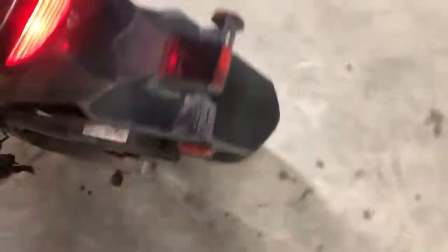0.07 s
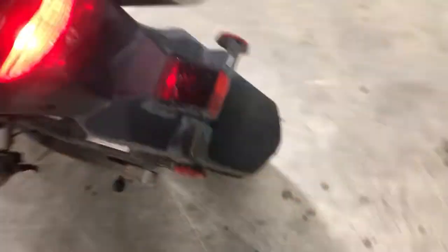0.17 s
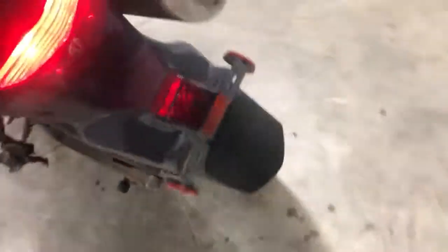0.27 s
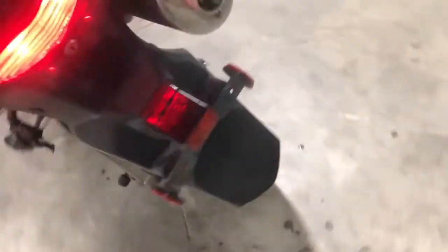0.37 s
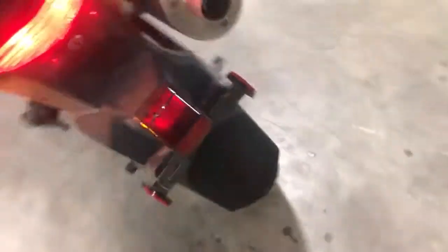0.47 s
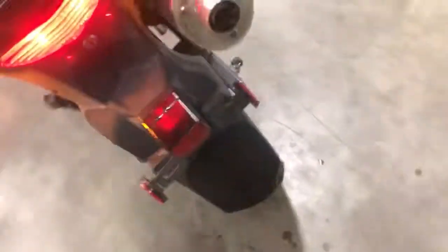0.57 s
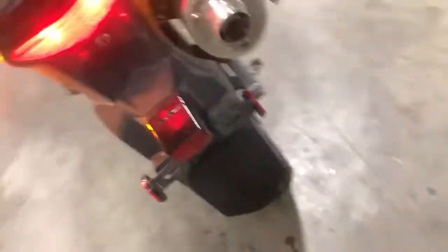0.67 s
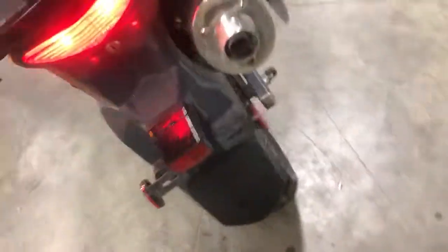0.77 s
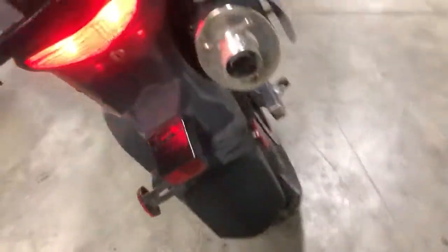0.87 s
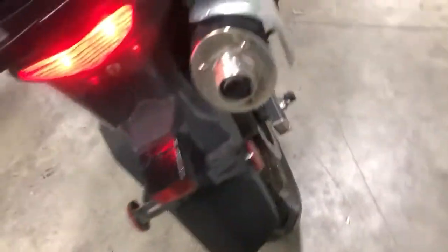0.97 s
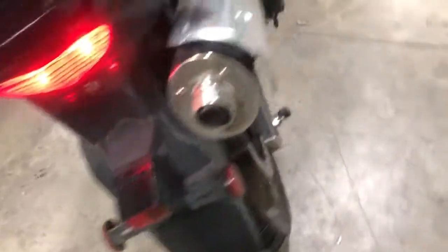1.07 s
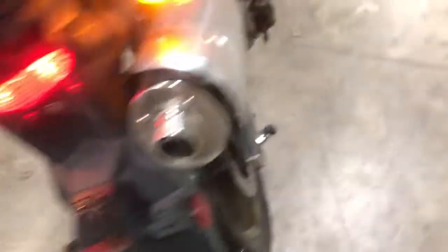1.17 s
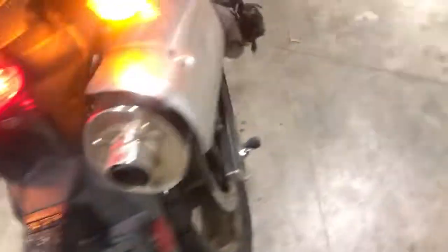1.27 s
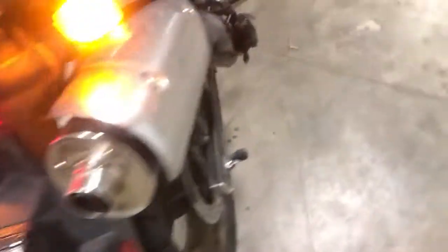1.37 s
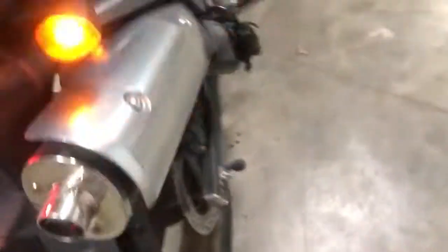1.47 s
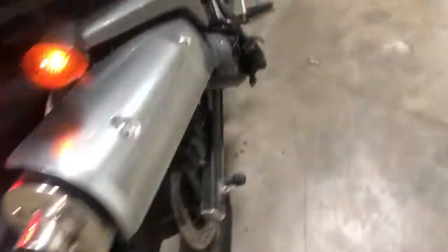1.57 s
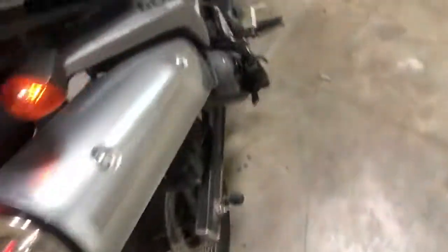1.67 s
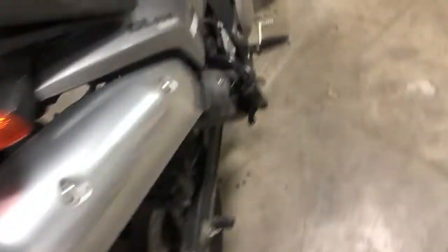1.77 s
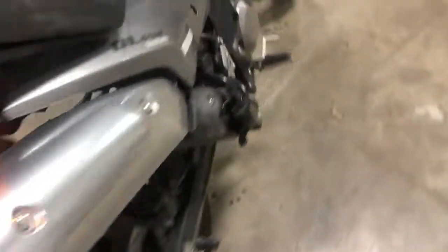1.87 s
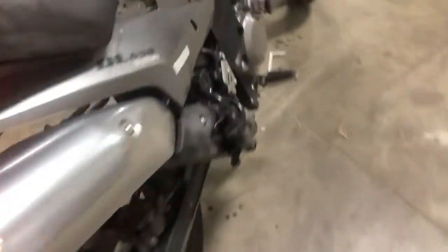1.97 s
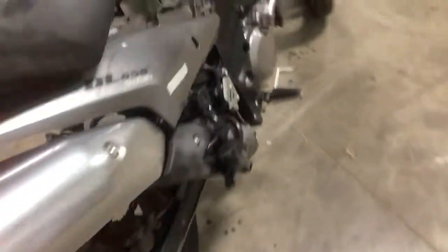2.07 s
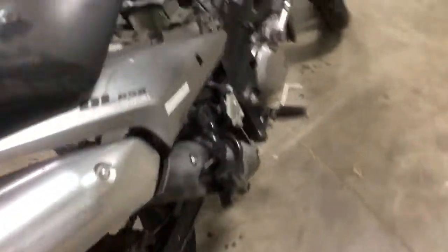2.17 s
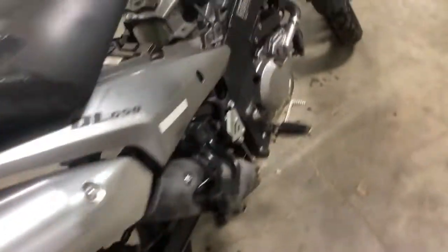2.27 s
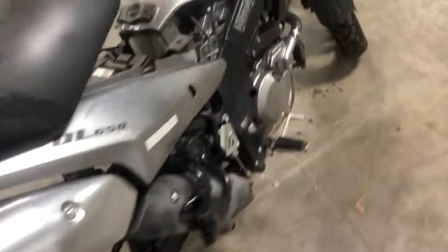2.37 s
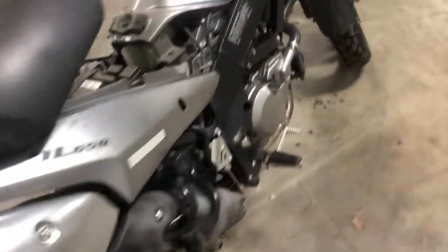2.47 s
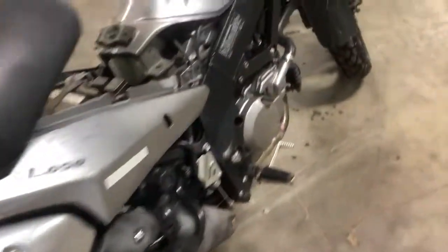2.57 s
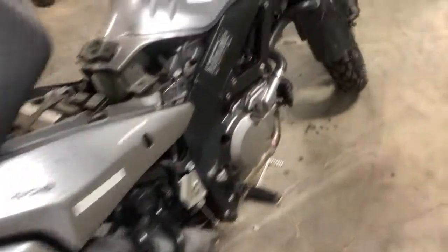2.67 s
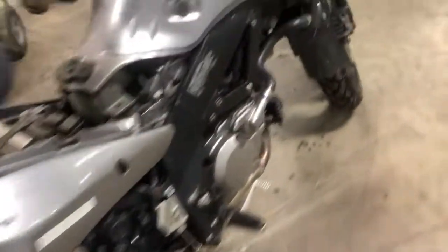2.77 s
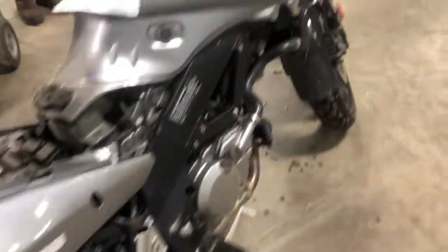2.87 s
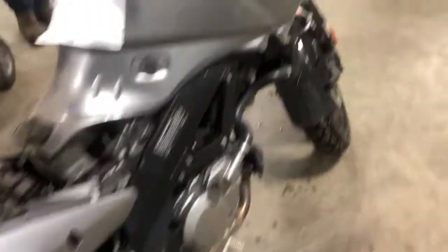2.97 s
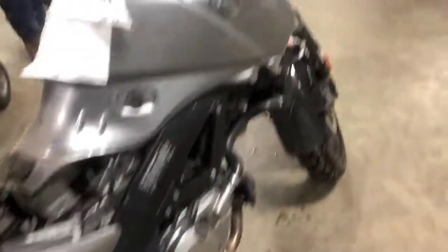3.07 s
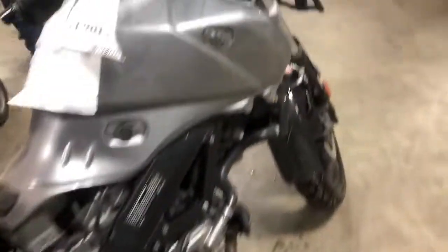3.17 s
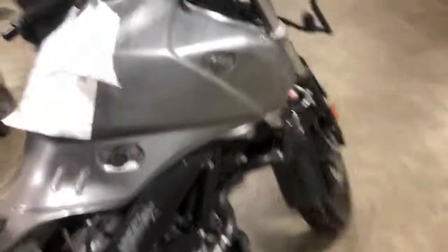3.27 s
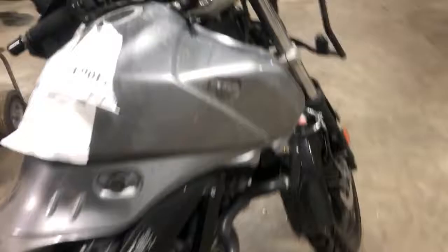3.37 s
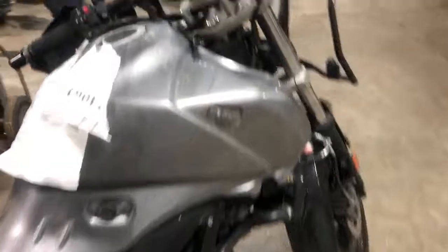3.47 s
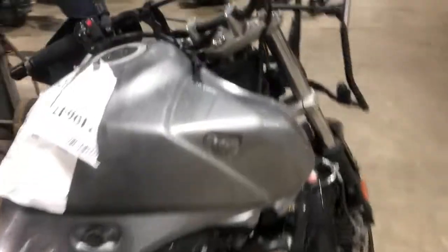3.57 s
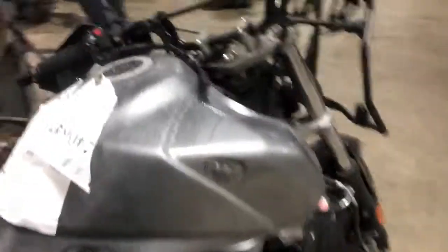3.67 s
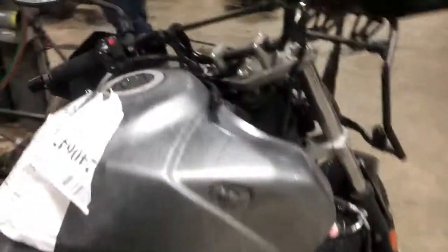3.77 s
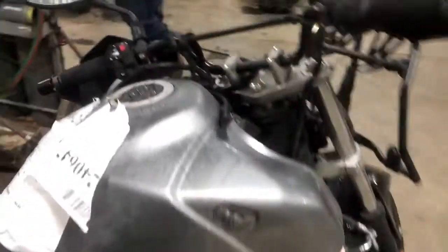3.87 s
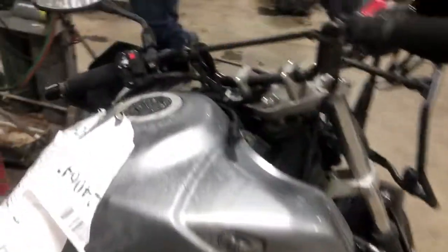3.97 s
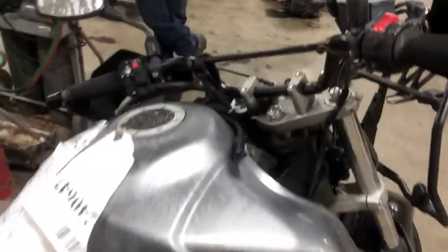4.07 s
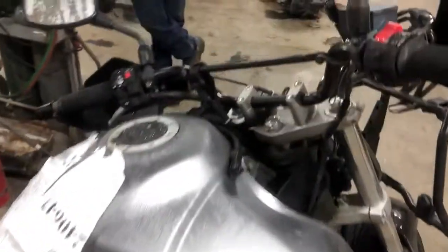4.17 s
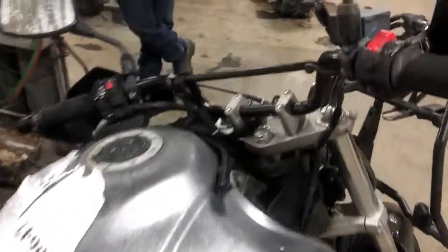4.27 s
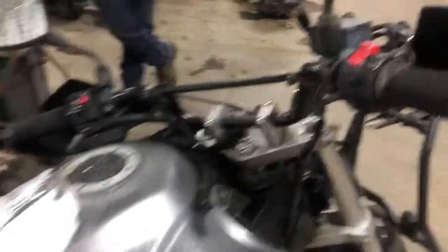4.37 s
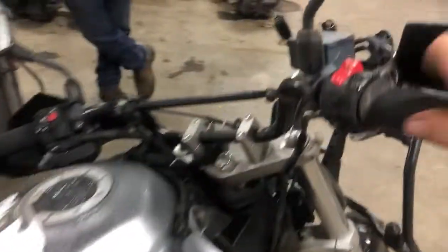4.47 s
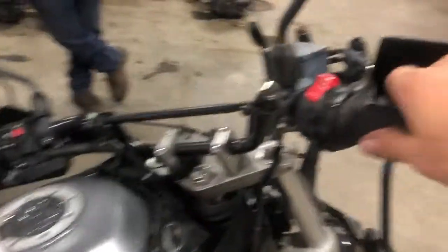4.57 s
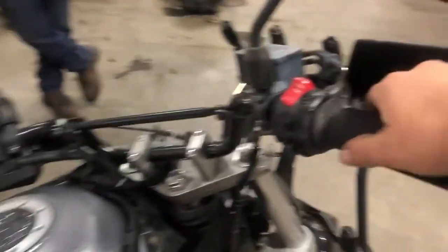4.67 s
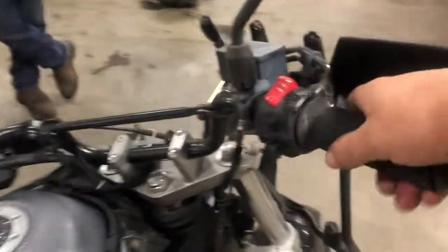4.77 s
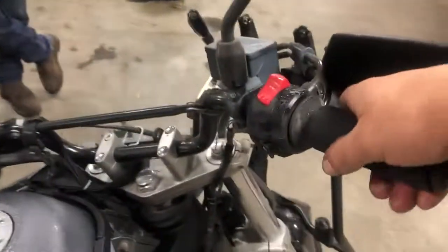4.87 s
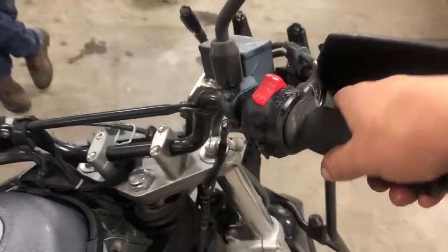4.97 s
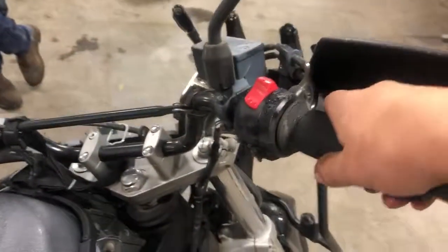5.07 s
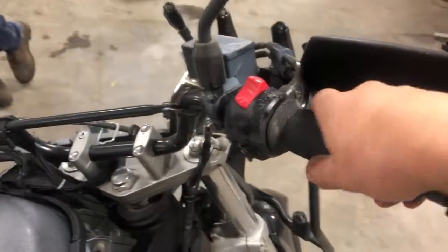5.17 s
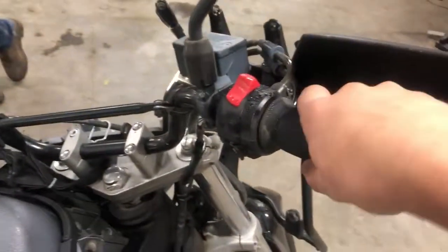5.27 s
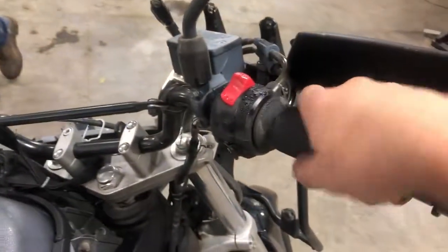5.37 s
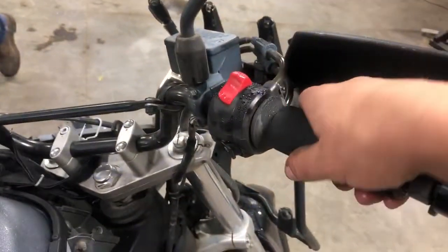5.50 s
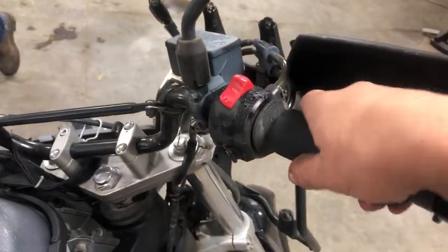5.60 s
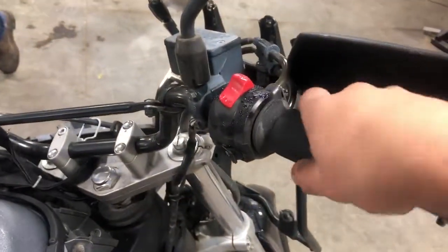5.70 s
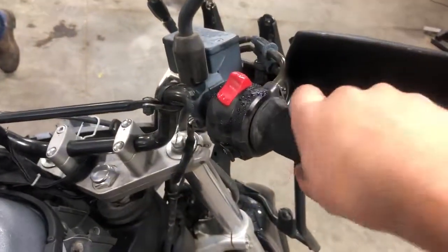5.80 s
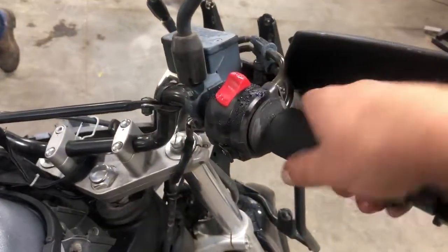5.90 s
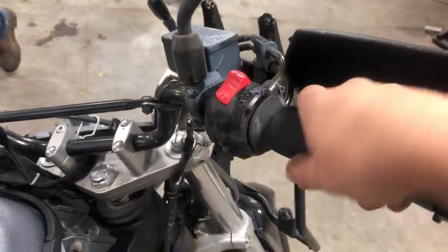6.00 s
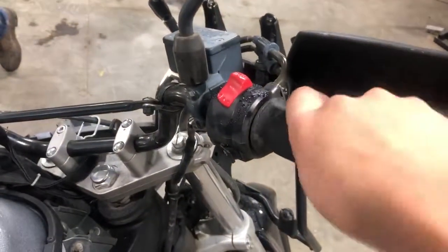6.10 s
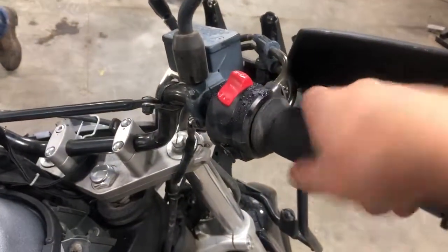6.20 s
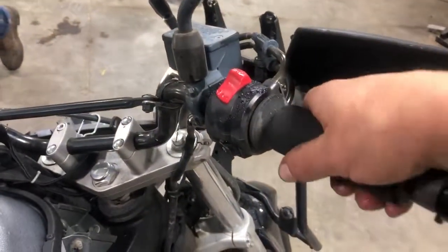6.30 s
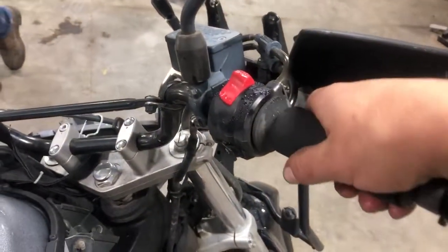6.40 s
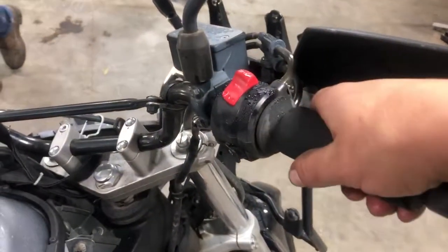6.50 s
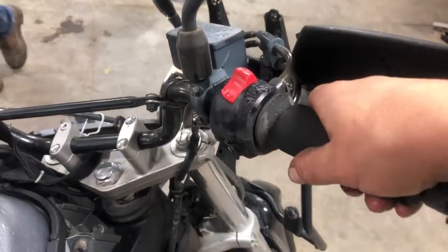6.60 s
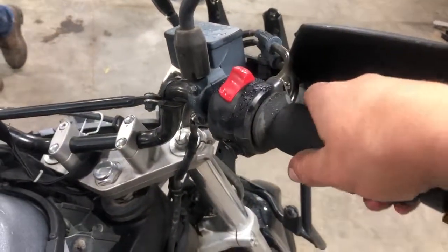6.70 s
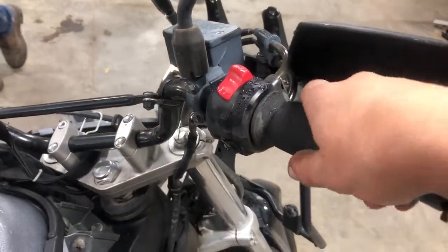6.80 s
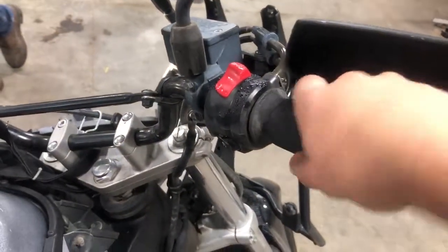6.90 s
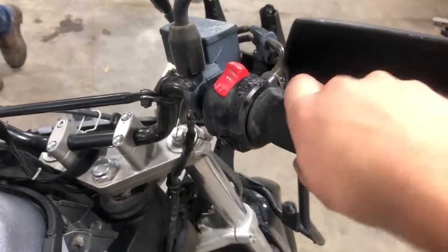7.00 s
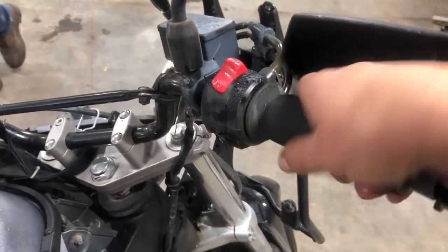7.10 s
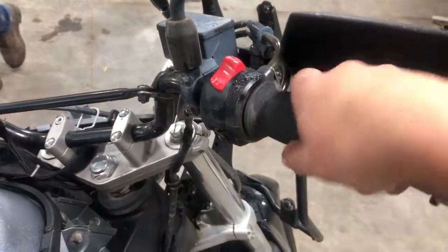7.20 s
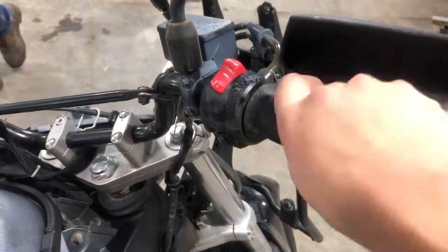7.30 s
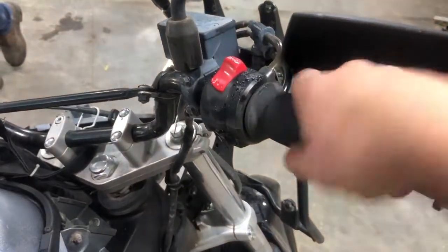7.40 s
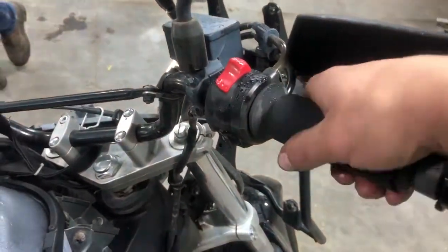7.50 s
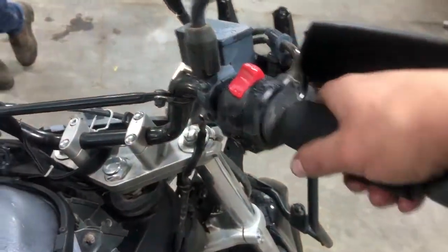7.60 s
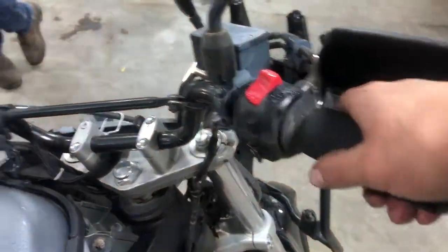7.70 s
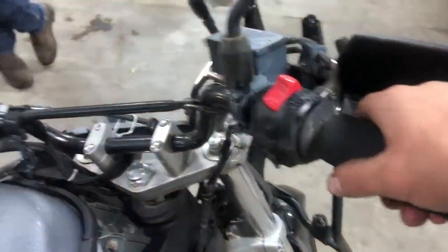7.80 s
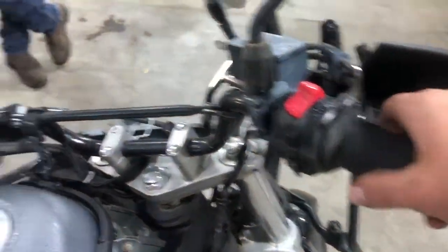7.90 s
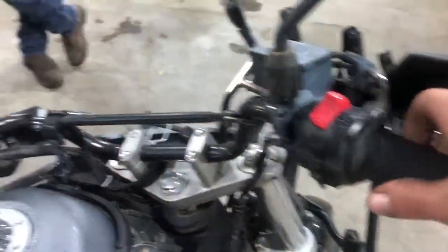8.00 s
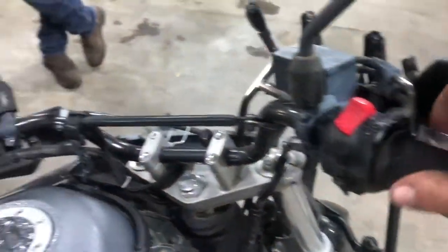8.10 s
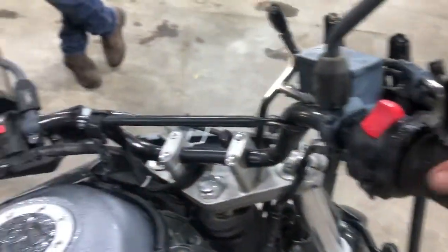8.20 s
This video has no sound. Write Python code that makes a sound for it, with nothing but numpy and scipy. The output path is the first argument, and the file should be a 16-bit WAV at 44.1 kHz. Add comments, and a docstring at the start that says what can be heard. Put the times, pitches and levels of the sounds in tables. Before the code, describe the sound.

From 0 s a twin-cylinder motorcycle idles steadily, its exhaust heard close: deep, soft thumps in uneven pairs, about eleven pairs a second, over valve clatter, whirring gears, a hollow panel hum and light hiss. Very faint scuffs occur near 0.2 and 1.3 s, with a tiny knock at 1.1 s. Between 1.5 and 4.5 s the microphone moves forward; exhaust bass recedes, mechanical clatter and short concrete-room reverberation stand out, and a gritty shoe scuff comes at 3.6 s. The idle hunts slightly. At 5.3 s the throttle snaps open with a sharp spit, followed by stronger blips at 5.8 and 6.1 s; intake honks, beats merge into a rough rising drone, peaking about 6.3 s. Revs sink until 7.0 s, when two more blips climb, the highest peaking at 7.5 s. The note then slides down, still above idle, to the end near 8 s.

```python
"""V-twin blipped in a workshop

A 90-degree V-twin motorcycle idles in a concrete workshop; the listener walks from silencer to handlebar.
Close to the silencer, two unevenly spaced firings per cycle thump through it, over clattering valves and gears.
Then come two groups of throttle blips: the airbox honks, the intake spits, and the revs sink back.
Clicks timed by the crank ring the resonances; noise makes gas, hiss, shoe scuffs and one faint knock;
sines make the drone."""
import sys
import numpy as np
from scipy import signal
from scipy.fft import rfft, irfft, next_fast_len
from scipy.io import wavfile
from scipy.ndimage import uniform_filter1d

SR = 44100
rng = np.random.default_rng(int(sys.argv[2]) if len(sys.argv) > 2 else 0)


def put_to_file(sound):
    """Save the sound as 16-bit audio at rate SR, in the file named by the first command-line argument."""
    columns = np.atleast_2d(sound).T  # one column per channel
    safe = np.clip(columns, -1, 1)
    whole_steps = np.round(safe * 32767)
    wavfile.write(sys.argv[1], SR, whole_steps.astype(np.int16))


N = 363825
TIME = np.arange(N) / SR   # s

# Broad colour of the workshop air: [f/Hz, gain/dB]
AIR_COLOUR = [(60, -12), (300, 13), (1000, 3), (4000, -15), (10000, -22.5), (16000, -33)]
# Shoe scuffs, and one short faint knock at 1.089 s:
# [t/s, level/dB, spread/s, grit level relative to rub/dB]
SCUFFS_AND_KNOCK = [(0.146, -55.5, 0.017, -9), (0.191, -55.5, 0.033, -11), (1.089, -57, .003, -21),
                    (1.28, -58.5, 0.071, -14), (3.527, -53, 0.035, -25), (3.597, -51, 0.013, -32),
                    (3.628, -47, 0.011, -10.5)]
# Hollow hum of the side cover at idle, strongest where it faces the listener: [t/s, level/dB]
COVER_LEVEL = [(0, -44.5), (.6, -48.5), (1.1, -46.5), (1.8, -57.5), (2.4, -50), (3.2, -45.5), (3.9, -54),
               (5.25, -51)]
COVER_REVS_DB = 14.5   # the cover hums this much louder at full revs

# Valve seatings: [place in the cycle/cycles, relative level/dB]
VALVE_SEATINGS = [(.08, -4), (.2, -1.5), (0.423, -9), (0.581, -3), (0.839, -2.5)]
# Broad colour of the valve and gear clatter: [f/Hz, gain/dB]
CLATTER_COLOUR = [(35, -14.5), (100, 8.5), (250, 14), (400, 1), (490, 0), (560, -10.5), (900, -10),
                  (1400, -17.5), (1700, -18), (2300, -21), (3000, -26), (3800, -29), (8500, -36),
                  (10500, -58.5), (15500, -60)]
# Resonances of the engine cases: [f/Hz, width/Hz, gain at the peak/dB]
CASE_RESONANCES = [(410, 31, 3.9), (662, 31, 10.55), (734.5, 68, 9.2), (914, 24, 8.7), (1118, 46, 10.3),
                   (1178, 79, 7.3), (1390.4, 53.6, 17.1), (2147, 50, 3.9), (2470, 150, 11.6),
                   (2880, 150, 5.9), (4760, 420, 6.1)]

# Sharp intake spits as the throttle snaps open: [t/s, level/dB, decay/s, pitch ratio]
INTAKE_SPITS = [(5.364, -26.5, 0.009, 1.02), (5.376, -38, 0.0068, 0.86), (5.826, -23.5, 0.019, 1.05),
                (5.842, -30, 0.02, 0.96), (5.861, -38, 0.035, 0.91), (7.045, -35, .008, 0.9),
                (7.119, -35, 0.011, 1)]
# Throttle body resonances behind the spits: [f/Hz, width/Hz, relative level/dB]
THROTTLE_BODIES = [(1074, 110, 12), (1320, 85, 15), (2800, 640, -8), (4140, 1000, -18), (8000, 2500, -35)]
# Airbox resonances: [f/Hz, width/Hz, relative level/dB]
AIRBOX_RESONANCES = [(251.4, 11.2, 7.5), (298, 78, -8.5), (393, 40, -18)]
# Silencer resonances: [f/Hz, width/Hz, relative level/dB]
SILENCER_RESONANCES = [(78, 31, -5), (103, 16, 0), (168, 22, -7), (235, 50, -24), (282, 35, -27)]

# Harmonics of the cycle when revving: [multiple, relative level/dB, extra level at open throttle/dB]
CYCLE_HARMONICS = [(2, -5.5, 11), (3, 3.5, -6), (4, 4.5, -7), (5, -3.5, 4), (6, 2.5, 5), (7, -7, 5),
                   (8, -7, 5), (9, -8, 7)]
# How the pipes pass those harmonics: [f/Hz, gain/dB]
PIPE_RESPONSE = [(40, -12), (56, 3.5), (70, 0), (82, 3), (96, 5.5), (108, -2), (122, -9), (145, -6),
                 (168, 4), (190, -4), (215, -12), (248, -3), (290, -12), (325, -18), (420, -16), (520, -28)]
DRONE_DB, DRONE_REVS_DB = -34.5, 12.5   # gain of the harmonics, and its rise up to full revs
MERGE_CYCLES_PER_S = (11, 26)   # the firings start to run together, and have fully merged

# The idle hunts a little: [t/s, four-stroke cycles per s]
IDLE_SPEED = [(0.0, 11.63), (0.5, 11.51), (0.75, 11.39), (1.2, 11.6), (1.6, 11.42), (2.3, 11.4),
              (2.75, 11.65), (3.2, 11.02), (3.5, 11.22), (3.85, 11.59), (4.4, 11.15), (5.0, 11.14),
              (5.29, 11.49)]
# Throttle blips: [t/s revs start to climb, t/s revs top out, top speed/cycles per s]
THROTTLE_BLIPS = [(5.324, 5.519, 35.75), (5.812, 6.0, 40.9), (6.138, 6.32, 49.0), (7.02, 7.203, 41.1),
                  (7.32, 7.533, 51.3)]
START_PHASE, V_GAP = .266, 270 / 720   # cycles: crank at the start, and first firing to second
COAST_S, FRICTION_CYCLES_PER_S = 1.307, 29.4   # decay time towards minus the friction speed
GRIP_LEAD_CYCLES, GRIP_OPEN_CYCLES, GRIP_SHUT_S = .9, 1.3, .1
REV_SPAN_CYCLES_PER_S = 40   # climb above idle that counts as full revs
LOAD_FADE = 0.83   # share of the throttle's extra dB in each part's swell that is gone at full revs

# The walk from silencer to handlebar: [t/s, silencer walk level/dB, engine case walk level/dB]
LISTENER_WALK = [(0, -1.5, 0.5), (.8, -1.05, -1.5), (1.3, .5, 2), (1.7, -0.5, 1), (2.1, -3, 1.4),
                 (2.5, -5.5, 1.5), (3, -6.5, 1), (3.9, -7, 2), (4.4, -8, 0.5), (5, -8.5, 0)]
# Room sound at zero silencer walk level, and dB it gains for each dB that the silencer fades
ROOM_NEAR_DB, ROOM_GROWTH = -12.5, 1.27

# How each part swells:
# [level at idle/dB, dB per dB of the walk, extra at full revs/dB, extra at full load/dB]
# Deep part of the note
BOOM_SWELL = (-25.5, 1, -9.5, 8)
# Middle part of the note, same columns
BARK_SWELL = (-30, 1.66, 4.5, 11.5)
# Upper part of the note, same columns
HONK_SWELL = (-43, 1.13, 8, 16)
# Lower part of the mechanical noise, same columns
RATTLE_SWELL = (-52.5, 1.5, 17.5, 13.5)
# Upper part of the mechanical noise, same columns
HISS_SWELL = (-63.5, 1, 20.5, 9.5)

CUTOFF_HZ = 15700   # top of the microphone's range


def from_db(db):
    """Decibels to gain."""
    return 10 ** (np.asarray(db) / 20)


def in_time(rows):
    """Each column of a curve table at every sample."""
    s, *columns = np.transpose(rows)
    return [np.interp(TIME, s, column) for column in columns]


def evened(x):
    """Hold the rms near 1 over about an idle cycle, keeping the single beats."""
    power = uniform_filter1d(x * x, size=3850)
    power = uniform_filter1d(power, size=3850)
    return x / np.sqrt(np.abs(power) + 1e-14)


def cut(x, hz, kind, order=2):
    """Butterworth filter."""
    return signal.sosfilt(signal.butter(order, hz, kind, fs=SR, output="sos"), x)


def split(x, hz):
    """The parts below and above a frequency; they add up to the whole."""
    low = signal.sosfiltfilt(signal.butter(4, hz, fs=SR, output="sos"), x)
    return low, x - low


def resonance(x, hz, width):
    """Two-pole resonance with gain 1 on top."""
    r = np.exp(-np.pi * width / SR)
    zeros = np.array([1, 0, -1]) * (1 - r * r) / 2
    poles = [1, -2 * r * np.cos(2 * np.pi * hz / SR), r * r]
    return signal.lfilter(zeros, poles, x + 1e-18)


def ring(x, modes):
    """Parallel resonances of alternating sign."""
    out = 0
    for k, (hz, width, db) in enumerate(modes):
        out = out + (-1) ** k * from_db(db) * resonance(x, hz, width)
    return out


def coloured(x, spectrum):
    """Give a sound a broad colour, interpolated over log frequency."""
    hz, db = np.transpose(spectrum)
    size = next_fast_len(N)
    bins = np.maximum(np.arange(size // 2 + 1) * SR / size, 1)
    gain = from_db(np.interp(np.log(bins), np.log(hz), db))
    return irfft(rfft(x, size) * gain, size)[:N]


def clicks(crank, share, scatter_db):
    """One click per cycle at a given crank position, each of its own strength."""
    turns = np.floor(crank - share)
    fired = np.diff(turns, prepend=turns[0])
    return fired * from_db(scatter_db * rng.standard_normal(N))


def puffs(strikes, decay_s):
    """Each click releases a dying burst of noise, its energy independent of the decay."""
    r = np.exp(-1 / (decay_s * SR))
    envelope = signal.lfilter([np.sqrt(1 - r * r)], [1, -r], strikes + 1e-18)
    return envelope * rng.standard_normal(N)


def workshop(x, wet_db, t60=1.0):
    """Add the diffuse tail of a hard room, from 8 ms after the direct sound."""
    t = TIME[:SR]
    tail = rng.standard_normal(SR) * from_db(-60 * t / t60) * (t > .008)
    return x + from_db(wet_db) * signal.fftconvolve(x, tail / np.linalg.norm(tail))[:N]


def swell(part, walk_db, revs, load):
    """Level of one part in dB, from the listener's place, the revs and the load."""
    idle_db, walk_share, revs_db, load_db = part
    return idle_db + walk_share * walk_db + revs_db * revs + load_db * load


def room_air(level_db=-60):
    """The steady hush of the workshop: coloured noise."""
    air = coloured(rng.standard_normal(N), AIR_COLOUR)
    return from_db(level_db) * air / np.std(air)


def scuffs_and_knock():
    """A sole drags over concrete, a dull rub with grit on top; one short burst is a faint knock."""
    rub = cut(rng.standard_normal(N), [350, 1400], "band")
    # cubed noise is spiky, like grit
    grit = cut(resonance(rng.standard_normal(N) ** 3, 3600, 1700), 13000, "low")
    rub, grit = rub / np.std(rub), grit / np.std(grit)
    out = np.zeros(N)
    for s, db, spread, grit_db in SCUFFS_AND_KNOCK:
        burst = np.exp(-.5 * ((TIME - s) / spread) ** 2)
        out += from_db(db) * burst * (rub + from_db(grit_db) * grit)
    return out


def side_cover(cover_db, hz=415, width=75):
    """Engine vibration, as steady noise, keeps one broad panel resonance humming."""
    hum = resonance(resonance(rng.standard_normal(N), hz, width), hz, 2 * width)
    return from_db(cover_db) * hum / np.std(hum)


def mechanism(crank, speed, clatter_db, hiss_db, whirr_db=1, tick_db=-10):
    """Valve seatings and the steady whirr of chains and gears ring the engine cases."""
    seatings = sum(from_db(db) * clicks(crank, share, scatter_db=3.0) for share, db in VALVE_SEATINGS)
    force = evened(puffs(seatings, decay_s=0.011))
    force = force + from_db(tick_db) * evened(seatings)
    force = force + from_db(whirr_db) * rng.standard_normal(N)
    sound = coloured(force, CLATTER_COLOUR)
    for hz, width, db in CASE_RESONANCES:
        sound = sound + (from_db(db) - 1) * resonance(sound, hz, width)
    body, hiss = split(workshop(sound, wet_db=-6.5), 1474)
    # the clatter's level is set by its part above 371 Hz
    clatter = body / np.std(split(body, 371)[1])
    # a narrow band whistles in the hiss as the engine speeds up
    revving = np.clip((speed - 12) / 15, 0, 1)
    hiss = hiss + from_db(2.5) * revving * resonance(hiss, hz=2824, width=170)
    return from_db(clatter_db) * clatter + from_db(hiss_db) * evened(hiss)


def spits():
    """Sudden bursts of gas, dying away, ring the throttle bodies, each at its own pitch."""
    out = np.zeros(N)
    for s, db, decay, ratio in INTAKE_SPITS:
        modes = [(hz * ratio, width, level) for hz, width, level in THROTTLE_BODIES]
        gas = rng.standard_normal(N)
        burst = (TIME >= s) * np.exp(-np.abs(TIME - s) / decay) + 1e-12
        out += from_db(db) * ring(burst * gas, modes) / np.std(ring(gas[:SR], modes))
    return workshop(out, wet_db=-6.5)


def intake(crank, throttle, shut_db=-24, open_db=-12, rough=1.0):
    """Each cylinder gulps air once per cycle and rings the airbox, harder with the throttle open."""
    gulps = clicks(crank, 0.034, scatter_db=1.5) + clicks(crank, .04 + V_GAP, scatter_db=-0.5)
    flow = gulps + rough * puffs(gulps, decay_s=0.01)
    honk = cut(ring(flow, AIRBOX_RESONANCES), 140, "high")
    return from_db(shut_db + (open_db - shut_db) * throttle) * evened(honk)


def exhaust(crank, speed, header_lead_s=0.0011, second_db=-0.5):
    """Two blow-downs per cycle; the second has the shorter header and arrives a little early."""
    first = clicks(crank, 0, scatter_db=-1.5)
    second = clicks(crank + header_lead_s * speed, V_GAP, scatter_db=3.5)
    firings = first + from_db(second_db) * second
    flow = firings + .12 * puffs(firings, decay_s=.015)
    thump = cut(ring(flow, SILENCER_RESONANCES), 37, "high", order=3)
    return evened(cut(thump, 260, "low"))


def thumps(crank, speed, throttle, wet_db):
    """Single exhaust thumps at idle give way to the intake as the revs climb."""
    merged = np.interp(speed, [17, 28], [0, .86])
    return workshop((1 - merged) * exhaust(crank, speed) + intake(crank, throttle), wet_db, t60=.5)


def registers(note, silencer_db, revs, load):
    """The deep, middle and upper parts of the note swell separately with load and listening position."""
    boom, upper = split(note, 135)
    bark, honk = split(upper, 210)
    parts = (BOOM_SWELL, boom), (BARK_SWELL, bark), (HONK_SWELL, honk)
    return sum(from_db(swell(part, silencer_db, revs, load)) * evened(x) for part, x in parts)


def drone(crank, speed, revs, throttle, waver_db=2.53):
    """At speed the firings run together into harmonics that swell as they glide through pipe resonances."""
    hz, pipe_db = np.transpose(PIPE_RESPONSE)
    out = np.zeros(N)
    for multiple, db, open_db in CYCLE_HARMONICS:
        waver = cut(rng.standard_normal(N), 16, "low")
        passed_db = np.interp(np.log(multiple * speed), np.log(hz), pipe_db)
        level = db + open_db * throttle + passed_db + waver_db * waver / np.std(waver)
        # the pipes delay high harmonics more, which spreads each pulse over the cycle
        lag = multiple * multiple / 7
        out += from_db(level) * np.sin(2 * np.pi * (multiple * crank - lag))
    merged = np.interp(speed, MERGE_CYCLES_PER_S, [0, 1])
    return workshop(merged * from_db(DRONE_DB + DRONE_REVS_DB * revs) * out, wet_db=-17, t60=.5)


def blipped(idle):
    """Engine speed and throttle: a blip pulls the revs up, then drag and friction slow the flywheel."""
    speed, throttle = idle, np.zeros(N)
    for start, end, top in THROTTLE_BLIPS:
        before = np.interp(start, TIME, speed)
        climb = before + (top - before) * np.sin(np.pi / 2 * (TIME - start) / (end - start))
        coast = (top + FRICTION_CYCLES_PER_S) * np.exp((end - TIME) / COAST_S) - FRICTION_CYCLES_PER_S
        speed = np.select([TIME < start, TIME < end], [speed, climb], np.maximum(coast, idle))
        # the grip opens about a cycle before the revs answer, and shuts as they top out
        opening = ((TIME - start) * before + GRIP_LEAD_CYCLES) / GRIP_OPEN_CYCLES
        shutting = (end - TIME) / GRIP_SHUT_S
        throttle = throttle + np.clip(np.minimum(opening, shutting), 0, 1)
    return speed, throttle


def scene():
    """The crank angle times the beats of the engine; revs, load and the walk set the levels."""
    idle, = in_time(IDLE_SPEED)
    silencer_db, cases_db = in_time(LISTENER_WALK)
    cover_db, = in_time(COVER_LEVEL)
    speed, throttle = blipped(idle)
    crank = START_PHASE + np.cumsum(speed) / SR   # cycles
    revs = (speed - idle) / REV_SPAN_CYCLES_PER_S
    load = throttle * (1 - LOAD_FADE * revs)

    cover = side_cover(cover_db + COVER_REVS_DB * revs)
    clatter_db = swell(RATTLE_SWELL, cases_db, revs, load)
    hiss_db = swell(HISS_SWELL, cases_db, revs, load)
    metal = mechanism(crank, speed, clatter_db, hiss_db)
    beats = thumps(crank, speed, throttle, ROOM_NEAR_DB - ROOM_GROWTH * silencer_db)
    note = registers(beats, silencer_db, revs, load) + drone(crank, speed, revs, throttle)
    return (room_air() + scuffs_and_knock() + cover + metal + spits() + note)[None]


def record(dry):
    """A small microphone sheds the deepest bass; the top is cut steeply."""
    thin = cut(dry, 27, "high", order=4)
    return signal.sosfilt(signal.ellip(10, .1, 90, CUTOFF_HZ, fs=SR, output="sos"), thin)


dry = scene()
out = record(dry)
put_to_file(out)
```